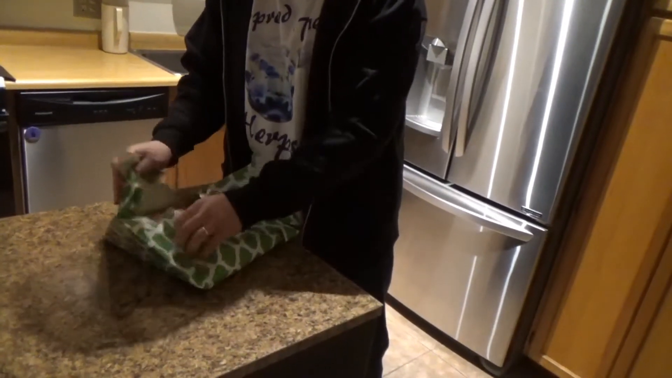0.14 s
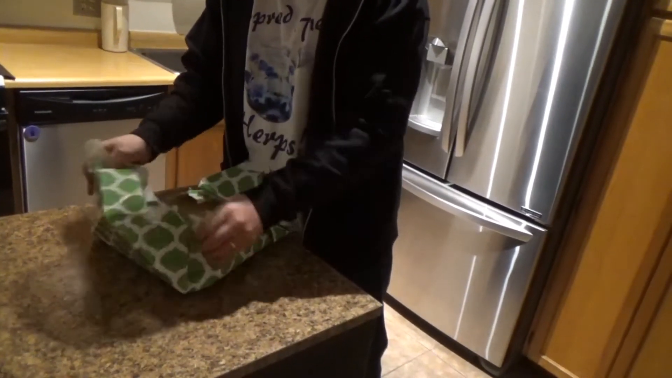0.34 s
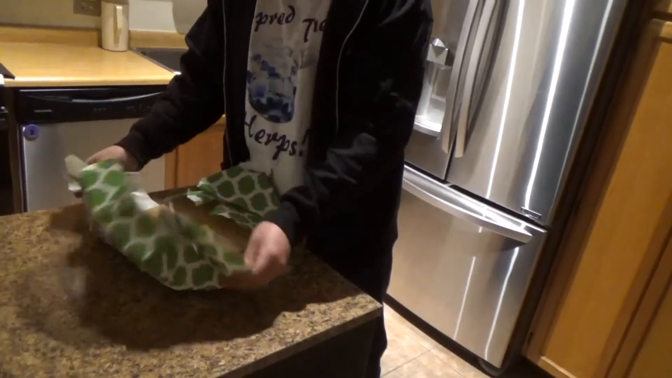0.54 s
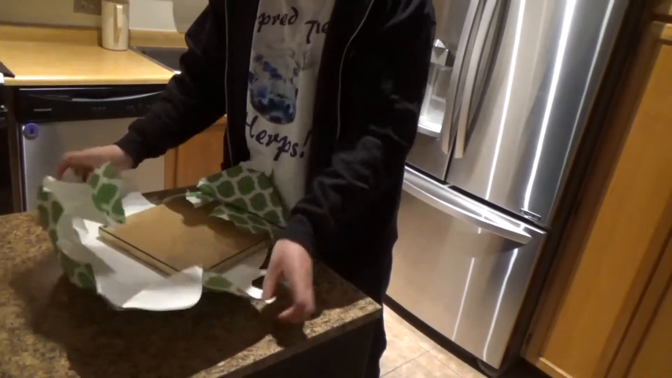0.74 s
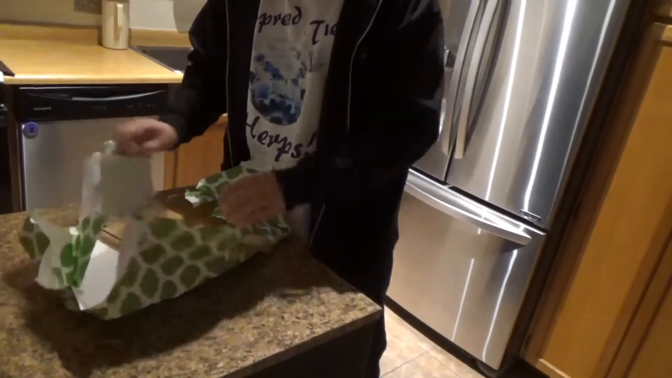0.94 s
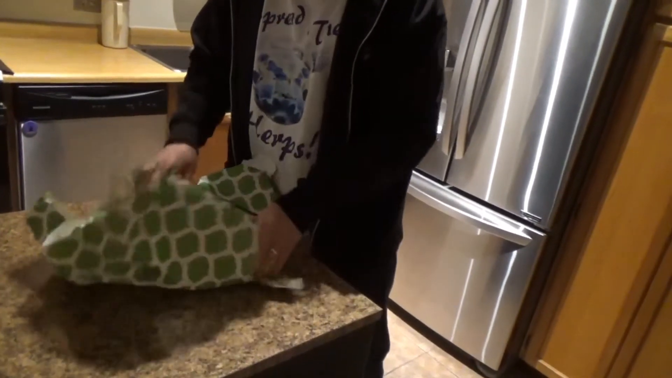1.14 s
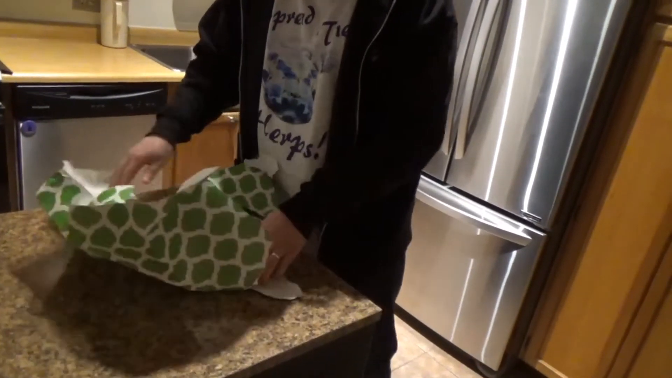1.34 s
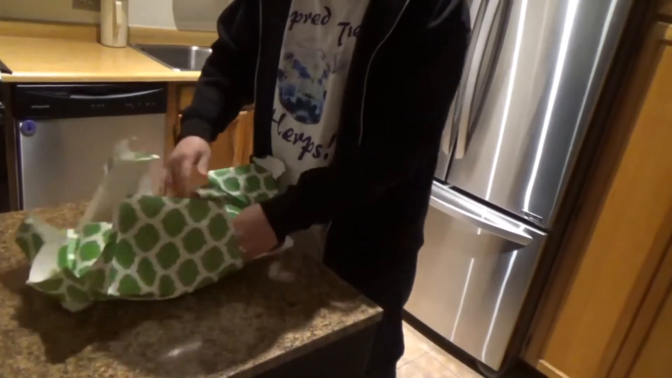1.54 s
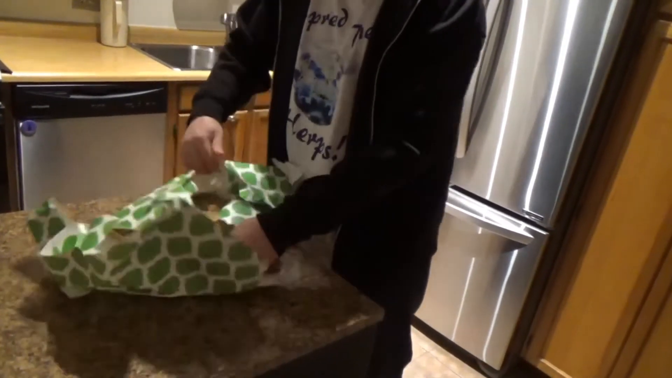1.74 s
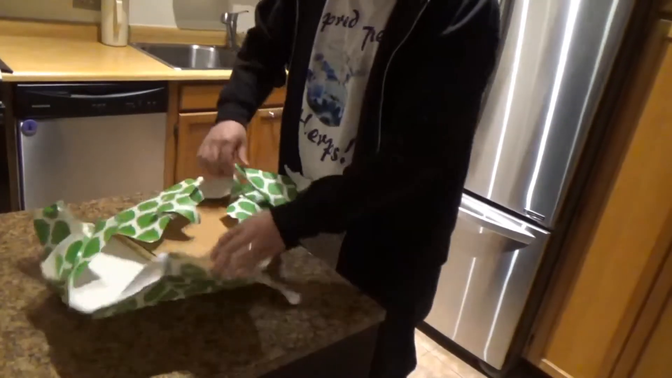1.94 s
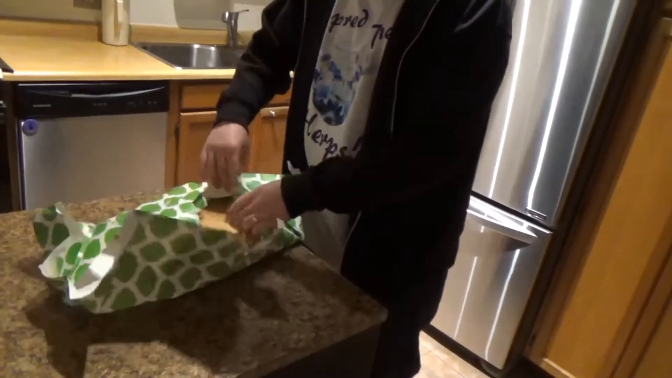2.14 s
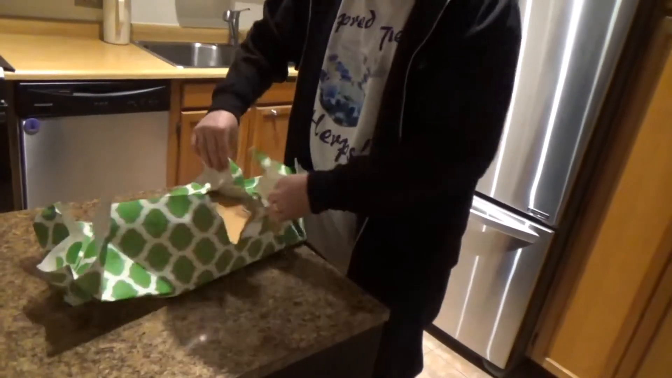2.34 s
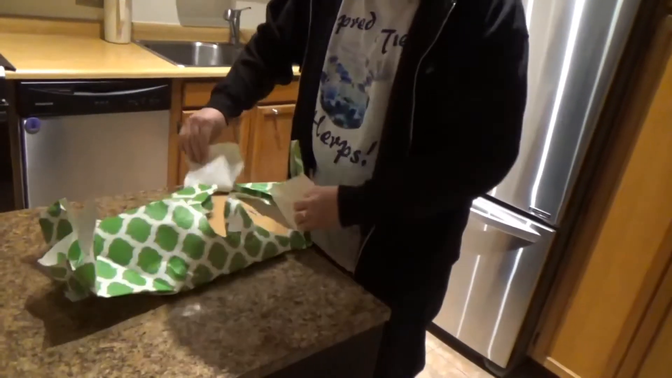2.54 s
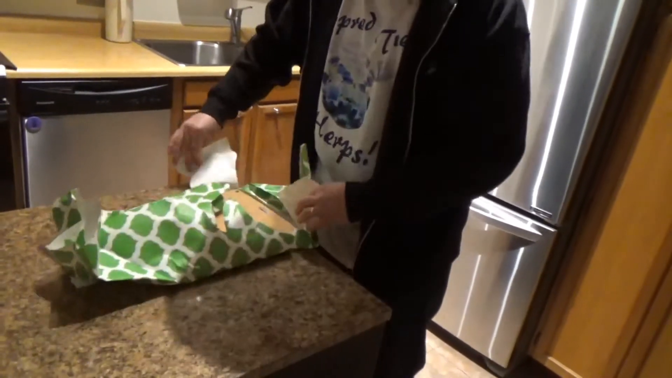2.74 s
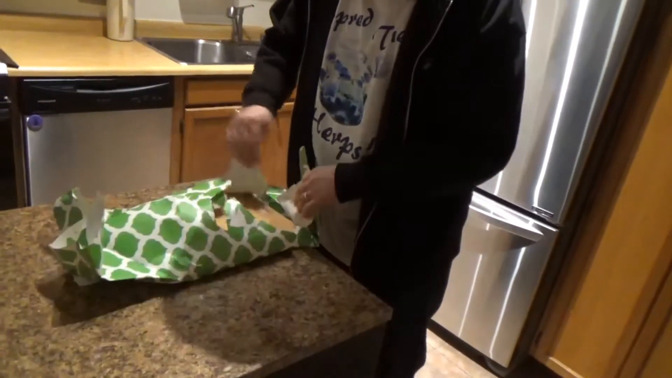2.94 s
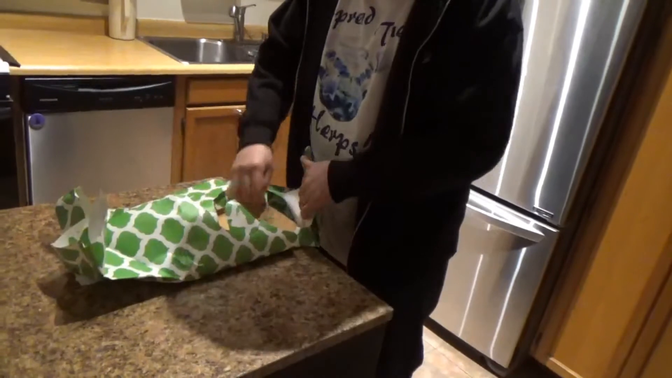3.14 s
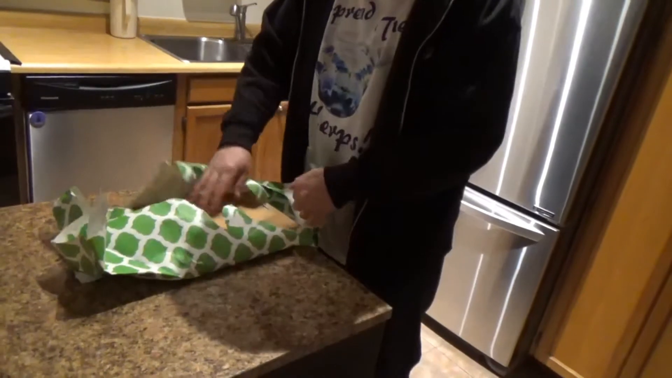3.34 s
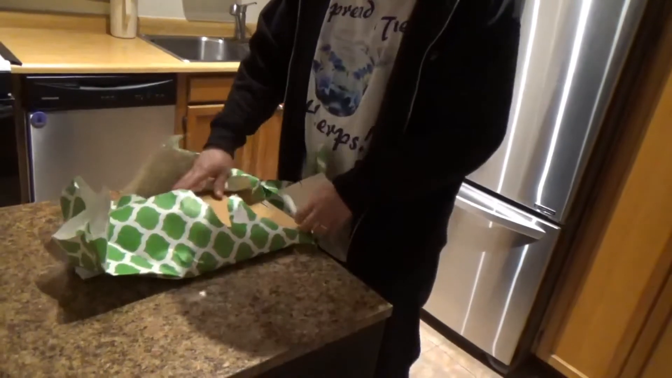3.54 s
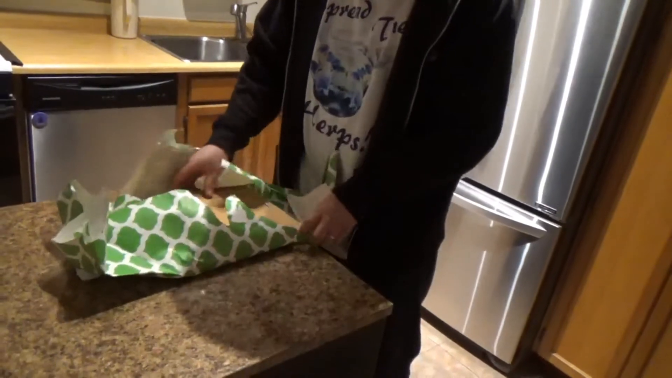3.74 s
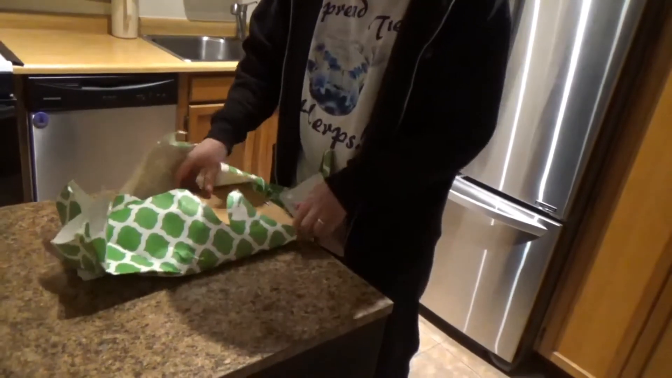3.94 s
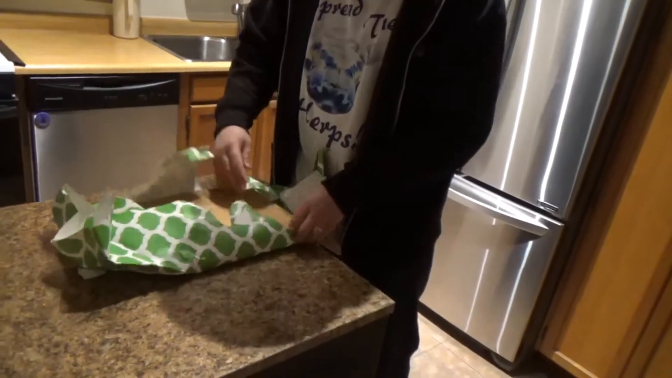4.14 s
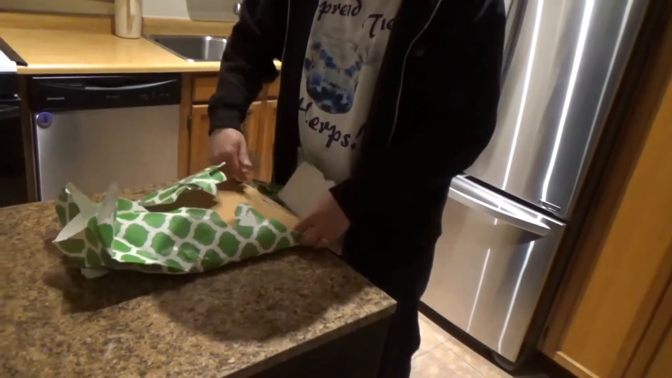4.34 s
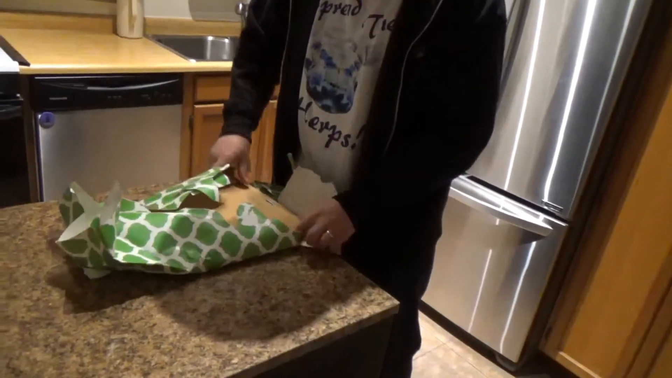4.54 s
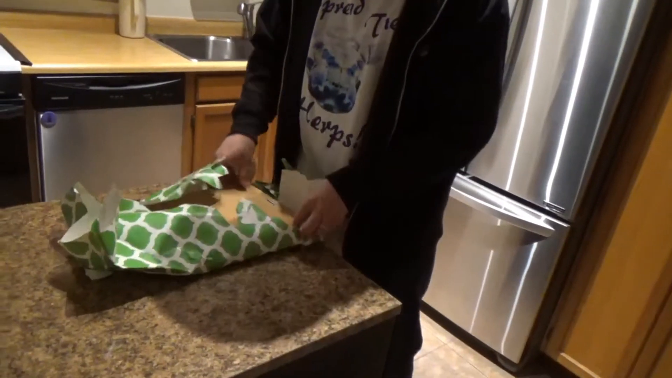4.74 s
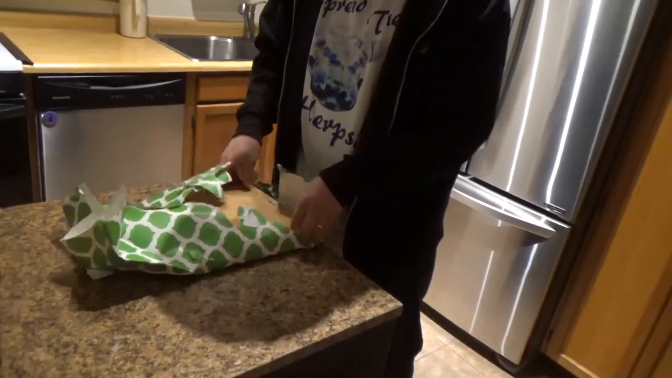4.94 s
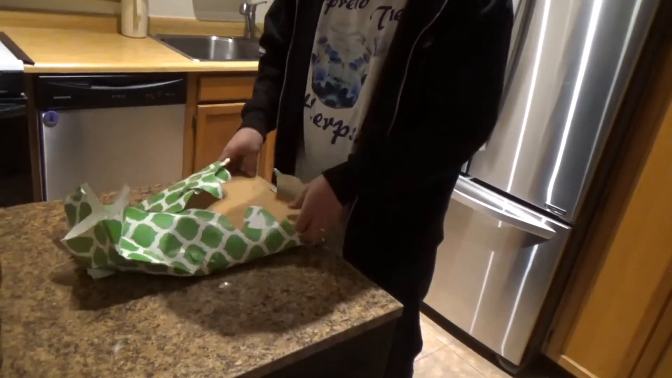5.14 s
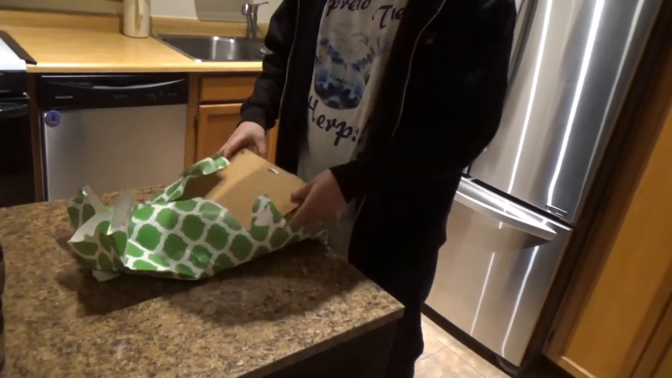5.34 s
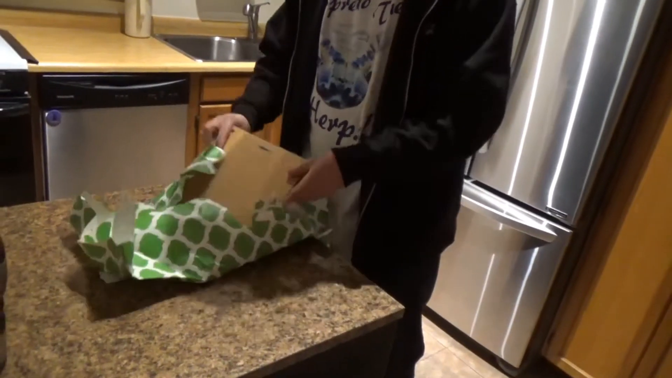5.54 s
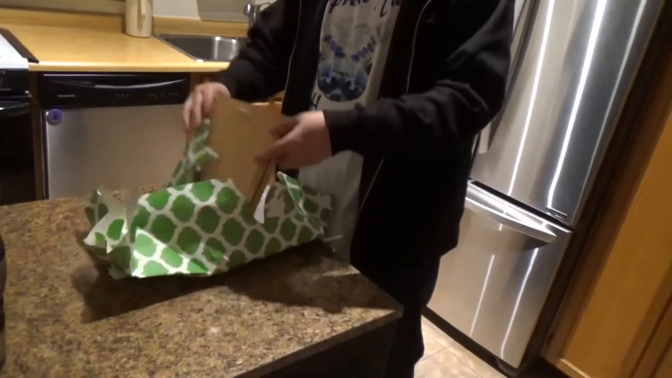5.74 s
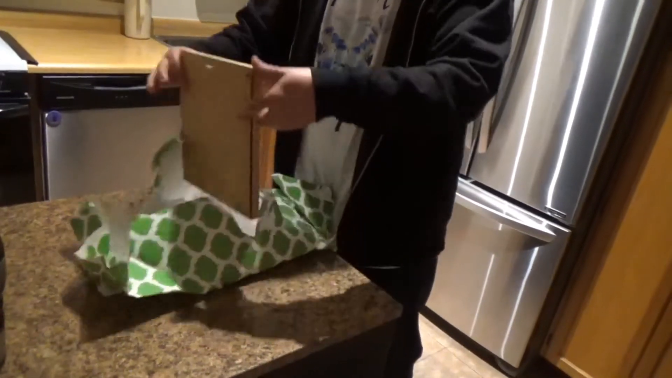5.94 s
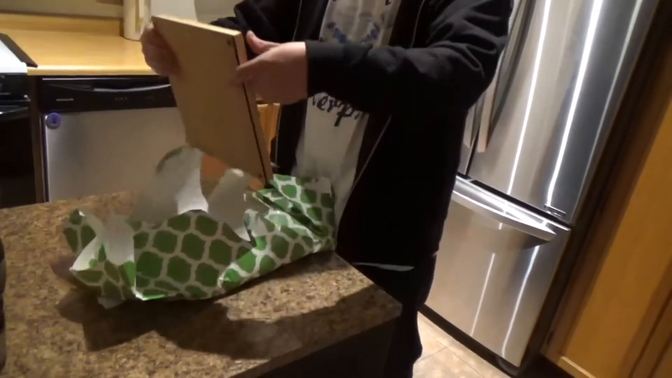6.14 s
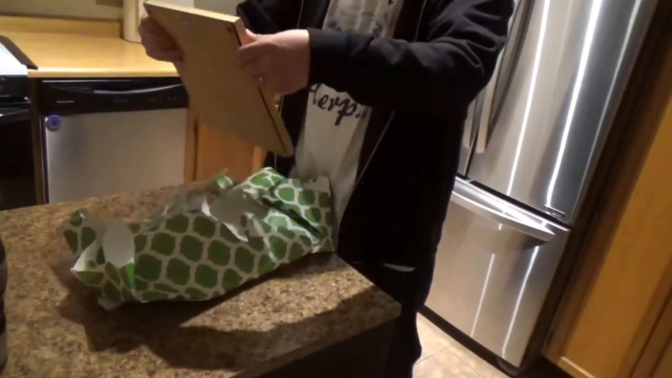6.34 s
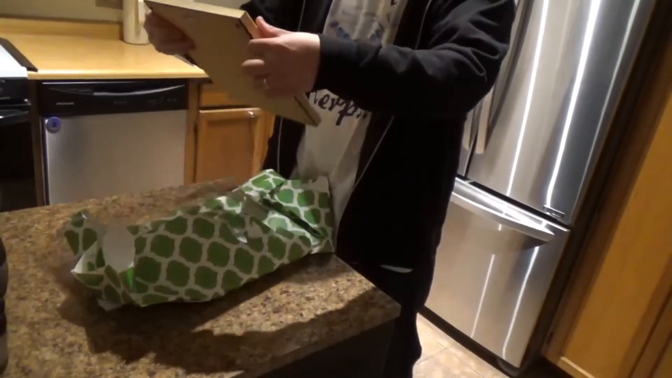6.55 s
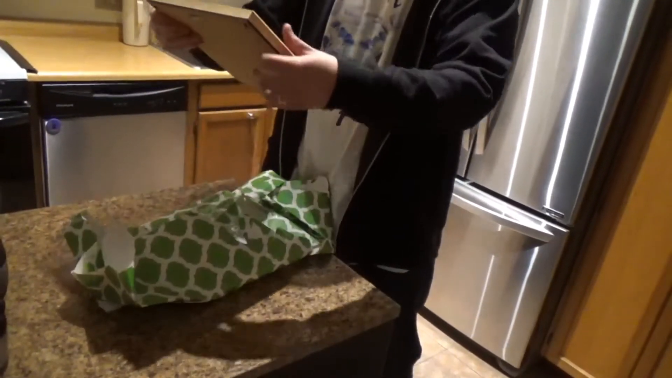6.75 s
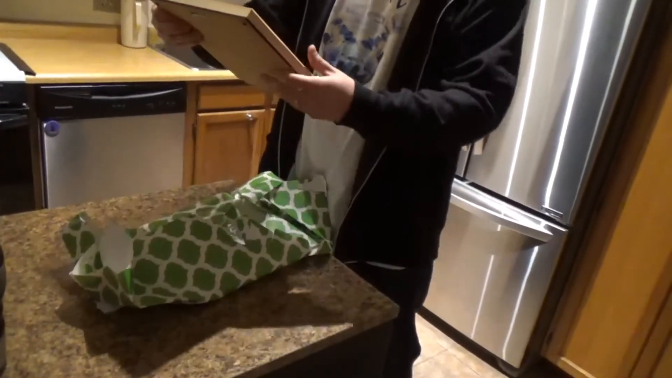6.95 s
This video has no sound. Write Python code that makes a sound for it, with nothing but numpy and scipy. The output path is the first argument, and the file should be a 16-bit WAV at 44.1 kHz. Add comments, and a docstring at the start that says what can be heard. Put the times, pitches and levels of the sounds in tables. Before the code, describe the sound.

Close, crisp gift-wrap tearing and crackling on a stone counter, ending as a board-backed present is drawn out and the room falls quiet.

```python
"""Gift wrap is torn and folded back by hand on a stone counter, then a flat board-backed present is lifted out.
Random buckles drive noise bands for the crackling paper; snaps, crunches and hollow pops are short rings on top.
The present drags and shudders as friction shakes its board, slides out with a wavering swish, and is tapped.
Echoes of a small hard-walled kitchen, wavering refrigerator tones and soft air noise surround it."""
import sys
import numpy as np
from scipy import signal
from scipy.io import wavfile
from scipy.ndimage import uniform_filter1d

SR = 44100
rng = np.random.default_rng(int(sys.argv[2]) if len(sys.argv) > 2 else 0)


def int16_out(signal):
    """Quantize to a 16-bit WAV file."""
    q = np.round(np.clip(np.atleast_2d(signal).T, -1, 1) * 32767)
    wavfile.write(sys.argv[1], SR, q.astype(np.int16))


N = 312669   # length in samples


def paper(crease_db=-11.0, creases_per_s=28):
    """Crumpling and tearing: the same buckles shake the sheet, ring its facets and break its fibres."""
    # How the bending sheet sounds. Each row: pitch in Hz, relative level in dB.
    flex_colour = [(150, -19.5), (240, -7.5), (370, 0.5), (600, 3.5)]
    # How the small flat facets sound. Each row: pitch in Hz, relative level in dB.
    facet_colour = [(800, -1.5), (1150, 1), (1700, 2), (2800, 3.5), (4000, 2), (5400, 2.5)]
    # How the breaking fibres sound. Each row: pitch in Hz, relative level in dB.
    fibre_colour = [(6500, 2), (7600, -2), (8900, 7), (10600, -3.5)]
    buckles_per_s, pull_db = 240, -37.5   # the rate, and the fibre level at which it holds
    rate_follows, slack_db = 0.7, -6      # power by which the rate follows the effort; least effort
    jerk_db, jerk_s, rip_pull_db = 3.2, 0.003, -27   # jerks are full once the fibres reach rip_pull_db
    rest_db, strip_db = -56, -6   # creases thin out below rest_db; strip_db is against the crinkling
    crinkling, breaking, flexing = hands()

    # gentle handling gives separate ticks; in a hard pull they run together into a jerky rip
    effort = np.maximum(breaking / from_db(pull_db), from_db(slack_db))
    pace = effort ** rate_follows
    ripping = np.minimum(breaking / from_db(rip_pull_db), 1)
    jerks = steady(from_db(jerk_db * ripping * wobble(jerk_s)), seconds=0.012)

    starts = buckles(per_s=buckles_per_s * pace, spread_db=0.0)   # all of one size
    flex = rustle(starts, flex_colour, 146, 739, burst_s=0.013, rub=0.15, count=5)
    facets = rustle(starts, facet_colour, 700, 6000, burst_s=0.0024, rub=0.3, count=9)
    fibres = rustle(starts, fibre_colour, 6000, 11500, burst_s=0.0015, rub=0.42, count=4)

    # in a rip the creases crowd together, each one slighter; at rest they die out
    crowding = pace * (1 + 2 * ripping ** 2)
    moving = np.minimum(crinkling / from_db(rest_db), 1) ** 2
    small_creases = creases(creases_per_s * crowding * moving)
    ticking = from_db(crease_db) * rms_one(small_creases / crowding ** 0.37)
    tearing = from_db(strip_db) * ripping * strip()

    crackle = (facets + ticking + tearing) * crinkling + fibres * breaking
    return flex * flexing + jerks * crackle


def hands():
    """Rips, folds and stirring add up in power: gains over time of crinkling, fibres and flexing."""
    # The paper rips. Each row: start in seconds, length in seconds, crinkling of the facets in dB,
    # breaking fibres in dB above the crinkling.
    rips = [(0.018, 0.029, -33.5, 10.5), (0.172, 0.022, -25, 2), (0.233, 0.099, -22.5, -0.5),
            (0.337, 0.15, -27, -1), (0.478, 0.072, -26.5, 3), (2.008, 0.084, -33.5, 1.5),
            (2.414, 0.019, -22.5, -2), (2.468, 0.19, -23, 1.5), (2.659, 0.13, -31.5, -2),
            (2.862, 0.01, -32, 3), (2.985, 0.066, -33.5, 3.5), (3.103, 0.074, -35.5, 0.5),
            (3.302, 0.017, -30, -0.5), (3.365, 0.1, -24, -1), (3.49, 0.14, -31, 3),
            (3.635, 0.11, -26.5, 0.5), (3.779, 0.047, -34.5, 1.5), (4.216, 0.06, -27.5, -1),
            (4.279, 0.046, -24, -1)]
    # A flap is gripped and folded back. Each row: start in seconds, length in seconds, crinkling in dB,
    # breaking fibres in dB above the crinkling, flexing of the sheet in dB above the crinkling.
    folds = [(0.0, 0.098, -29, -14, -26), (0.18, 0.37, -32, -13, -7.5), (0.549, 0.18, -29.5, -16, -14),
             (0.803, 0.02, -32.5, -13, -12), (0.918, 0.014, -29.5, -17, -13.5), (0.988, 0.22, -32, -9, -13),
             (1.165, 0.019, -30, -7.5, -7.5), (1.238, 0.065, -38.5, -2, -11),
             (1.417, 0.018, -40, -8.5, -12), (1.565, 0.027, -35, -4.5, -5.5), (1.619, .19, -32, -4, -9),
             (1.846, 0.12, -38, -15, -12.5), (2.149, 0.088, -35.5, -5, -13.5), (2.287, 0.3, -31.5, -6, -11),
             (2.871, 0.22, -32.5, -4.5, -10.5), (3.213, 0.043, -34.5, -6.5, -7.5),
             (3.31, 0.24, -37, -5, -13), (3.66, 0.12, -34.5, -31, -12), (3.97, 0.095, -39, -2.5, -22),
             (4.088, 0.14, -34.5, -0.5, -13), (4.333, .21, -35, 1, -9.5), (4.68, 0.25, -44, 1, -10.5),
             (4.894, 0.068, -37, 0, -13), (5.079, 0.094, -38.5, 4.5, -19), (5.181, 0.041, -31, -10, -15),
             (5.278, 0.12, -36.5, -6.5, -5), (5.447, 0.02, -32, -5, -7.5),
             (5.507, 0.15, -33.5, -2.5, -12.5), (5.733, 0.21, -31.5, -2.5, -13),
             (5.961, 0.17, -34.5, 3.5, -17)]
    # The loose wrap stirs, falls nearly still, then stirs faintly again.
    # Each row: time in seconds, crinkling in dB.
    stir = [(0, -27.5), (0.78, -46), (0.9, -54), (1.52, -51), (1.7, -44.5), (2.2, -38.5), (3.8, -43),
            (4.65, -46.5), (5.5, -39), (6.15, -41), (6.35, -53), (6.78, -64), (7.08, -55.5)]
    rip_flex_db = -18   # a taut sheet hardly flexes: level against its crinkling
    stir_fibre_db, stir_flex_db = -2, -15   # against the crinkling

    stir_db = in_time(stir)[0]
    power = from_db(stir_db + np.array([[0], [stir_fibre_db], [stir_flex_db]])) ** 2
    for s, length, db, fibre_db in rips:
        pull = stroke(s, length, attack_s=0.015, sag_db_per_s=16, release_db_per_s=284)
        power += np.outer(from_db([db, db + fibre_db, db + rip_flex_db]) ** 2, pull)
    for s, length, db, fibre_db, flex_db in folds:
        push = stroke(s, length, attack_s=0.0046, sag_db_per_s=11, release_db_per_s=161.5)
        power += np.outer(from_db([db, db + fibre_db, db + flex_db]) ** 2, push)
    return np.sqrt(power)


def stroke(start, length, attack_s, sag_db_per_s, release_db_per_s):
    """Power of one hand move: it takes hold quickly, eases while it lasts, then the paper comes to rest."""
    t = np.maximum(np.arange(N) / SR - start, 0)
    # the release adds to the sag once the move is over
    fall_db = sag_db_per_s * t + release_db_per_s * np.maximum(t - length, 0)
    gain = np.minimum(t / attack_s, 1) * from_db(-np.minimum(fall_db, 100))
    return gain ** 2


def buckles(per_s, spread_db):
    """Random moments at which the paper gives; spread_db sets how unequal they are, up to a limit."""
    happens = rng.random(N) < per_s / SR
    sizes = from_db(spread_db * np.minimum(rng.exponential(1, N), 4))
    return happens * sizes


def rustle(starts, colour, low_hz, high_hz, burst_s, rub, count, variety_db=4.5, click=0.41):
    """Each buckle clicks, starts a short avalanche and favours its own pitches; rubbing fills the gaps."""
    out, edges = 0, np.geomspace(low_hz, high_hz, count + 1)
    fractures = [ticks(N, spread_db=4.0) for _ in range(2)]
    for k, (low, high) in enumerate(zip(edges, edges[1:])):
        # each band gets a new random strength every 32 samples
        strengths = from_db(variety_db * rng.standard_normal(N // 32 + 1))
        favour = np.repeat(strengths, 32)[:N]
        kicks = rms_one(starts * favour)
        burst_power = fade(kicks ** 2, burst_s) / (burst_s * SR)
        avalanche = fractures[k % 2] * np.sqrt(burst_power + rub ** 2)
        grains = band(avalanche + click * (-1) ** k * kicks, low, high)
        level_db = at_hz(colour, np.sqrt(low * high))
        out = out + from_db(level_db) * rms_one(grains)
    return steady(out, seconds=0.046)


def creases(per_s, spread_db=2.6, damping=0.21, run_s=0.00052, count=7):
    """Small creases give at random, each with a sharp tick and the ring of its own facet; rms 1 overall."""
    kicks = buckles(per_s, spread_db)
    dealt = rng.integers(0, count, N)   # which facet each crease rings
    fractures, out = ticks(N, spread_db=0.5), 0
    for k, hz in enumerate(np.geomspace(1200, 5200, count)):
        run = fractures * fade(kicks * (dealt == k), run_s)
        ring = resonate(run, hz, damping * hz) * np.sqrt(3000 / hz)
        tick = 0.76 * band(run, 870, 12700)
        out = out + ring + tick
    return rms_one(out)


def strip():
    """The torn strip rings in a narrow band that wanders and flares as its length and tension change; rms 1."""
    middle_hz, wander_octaves, wander_s = 2950, 0.3, 0.012
    hz = middle_hz * 2 ** (wander_octaves * wobble(wander_s))
    grain = band(ticks(N), 20, 330) * from_db(5 * wobble(wander_s / 2))
    return rms_one(grain * np.sin(2 * np.pi * np.cumsum(hz) / SR))


def snaps(pull_stretch=0.54, crack_share=0.45, puff_db=-40):
    """A crease pops through: a flick, a crack, a facet's ring, a shiver of the sheet and a faint puff of air."""
    # Loud creases giving way, and last the click of a light tap on the board.
    # Each row: time in seconds, body level in dB, pitch of the ring in Hz, crack level in dB.
    sharp_sounds = [(0.074, -9.5, 2330, -25), (0.178, -35, 3360, -11), (0.436, -13.5, 2760, -13),
                    (0.464, -13, 4800, -15), (0.561, -13.5, 2020, -18), (0.575, -18, 2190, -16),
                    (0.662, -14.5, 2810, -27), (0.821, -20, 3000, -30), (1.0665, -17.5, 2700, -16.5),
                    (1.1881, -13, 2080, -17), (1.234, -21, 2800, -35), (1.251, -25, 3600, -20.5),
                    (1.529, -15.5, 1510, -45), (1.577, -28, 1510, -18), (1.625, -21, 2200, -22),
                    (1.656, -15.5, 1850, -39), (1.7728, -12, 3100, -30), (1.797, -15, 1320, -20.5),
                    (1.839, -19, 3730, -34), (1.8592, -16.5, 1760, -18), (1.914, -15.5, 3240, -17),
                    (2.013, -17.5, 2620, -21), (2.061, -19, 1400, -26), (2.074, -24, 2700, -17),
                    (2.29, -13.5, 5260, -22), (2.307, -13, 2070, -16), (2.3163, -18, 2400, -13.5),
                    (2.468, -9.5, 1330, -14), (2.805, -20.5, 2170, -35), (2.923, -20, 2920, -23),
                    (3.04, -17.5, 4000, -13.5), (3.2367, -23, 3880, -15.5), (3.3666, -15, 3330, -16),
                    (3.4495, -9.5, 2980, -6), (3.6955, -14, 3080, -26), (3.744, -15, 3400, -18),
                    (3.791, -17.5, 2240, -17.5), (4.029, -14.5, 1860, -20), (4.122, -15, 3660, -15),
                    (4.136, -20, 3200, -14.5), (4.263, -13.5, 3860, -15), (4.448, -15.5, 1920, -17),
                    (4.4575, -17, 2670, -15), (4.4668, -15, 2940, -16), (4.815, -26.5, 1180, -34),
                    (4.922, -16, 3200, -38), (5.448, -17, 3100, -52), (5.463, -18.5, 1820, -13.5),
                    (5.559, -16.5, 2250, -39), (5.706, -29, 3500, -17.5), (5.749, -15.5, 2640, -37),
                    (5.758, -15, 2180, -26), (5.7735, -14.5, 2820, -35), (5.8053, -14.5, 3580, -31),
                    (6.512, -38, 2290, -52)]
    out, t = np.zeros(N), np.arange(SR // 20) / SR
    run_s, shiver_db, shiver_s = 0.0011, -27, 0.013
    shiver = from_db(shiver_db) * np.exp(-t / shiver_s)
    flick = 4.0 * (t == 0)
    puff = band(np.exp(-t / 0.0013), 30, 350)
    for s, body_db, hz, crack_db in sharp_sounds:
        # a dull snap is little more than a flick; the more fibres crack, the longer it runs on
        length = run_s * from_db(pull_stretch * max(crack_db + 29.5, -4))
        body_run = flick + ticks(len(t)) * (np.exp(-t / length) + shiver)
        crack_run = flick + ticks(len(t)) * (np.exp(-t / (crack_share * length)) + shiver / 2)
        add(out, s, body_db, facet_ring(body_run, hz))
        add(out, s, crack_db, fibre_crack(crack_run))
        add(out, s, body_db + puff_db, puff)
    return out


def crunches():
    """A crease collapses along its length: a run of fractures that swells and dies."""
    # Creases that crumple in a quick run. Each row: time of its height in seconds, body level in dB,
    # pitch of the paper facet in Hz, crack level in dB.
    crumples = [(2.2105, -10.5, 3070, -17), (2.432, -21, 1900, -16), (2.886, -16.5, 3150, -14.5),
                (3.994, -19, 3250, -16), (4.2065, -21, 3800, -10), (6.386, -33.5, 2420, -38.5)]
    crunch_s = 0.0025   # sets how quickly a run swells, and again dies
    out, t = np.zeros(N), np.arange(-SR // 20, SR // 20) / SR
    swell = 1 / np.cosh(2 * t / crunch_s) ** 0.5
    for s, body_db, hz, crack_db in crumples:
        add(out, s + t[0], body_db, facet_ring(ticks(len(t)) * swell, hz))
        add(out, s + t[0], crack_db, fibre_crack(ticks(len(t)) * swell))
    return out


def facet_ring(run, hz):
    """The facet beside a crease rings for a few cycles, and the sheet around it joins in near that pitch."""
    damping, sheet_share = 0.32, 0.22
    ring = resonate(run, hz, damping * hz)
    return band(ring + sheet_share * run, 0.41 * hz, 2.44 * hz)


def fibre_crack(run):
    """Breaking fibres give a broad crack with a bright top."""
    crack = band(run, 3800, 11000)
    return crack + 3.0 * resonate(crack, 9000, 1900)


def pops(flutter_s=0.016, damping=0.17, onset_s=0.00056):
    """A wide panel flips and flutters to rest, ringing low over the hollow beneath; a weak one is shorter."""
    # Broad panels flip over, and last a light tap on the board.
    # Each row: time in seconds, level in dB, pitch in Hz.
    hollow_sounds = [(0.942, -21, 1050), (1.68, -16.5, 1080), (1.798, -16.5, 930), (2.920, -19, 730),
                     (2.978, -17.5, 940), (3.216, -14, 980), (3.261, -18, 1070), (4.92, -18, 1360),
                     (5.293, -19, 1310), (5.404, -19, 1320), (5.770, -19, 920), (6.511, -29.5, 1250)]
    out, t = np.zeros(N), np.arange(SR // 10) / SR
    strongest_db = max(db for _, db, _ in hollow_sounds)
    for s, db, hz in hollow_sounds:
        length = flutter_s * from_db((db - strongest_db) / 2)
        flutter = ticks(len(t)) * np.exp(-t / length) * (1 - np.exp(-t / onset_s))
        add(out, s, db, resonate(band(flutter, 680, 3100), hz, damping * hz))
    return out


def present():
    """Friction drives the backing board: a rough drag, then a brief stick-slip shudder."""
    # The present drags on the counter, then creeps a little further. Each row: time in seconds, level in dB.
    drag_path = [(4.15, -95), (4.22, -55), (4.29, -36), (4.34, -33), (4.42, -60), (4.6, -59), (4.72, -49.5),
                 (4.82, -57), (4.9, -88)]
    # It shudders as it is tipped up. Each row: time in seconds, slips per second, level in dB.
    shudder_path = [(5.285, 168, -75), (5.298, 144, -31), (5.32, 164, -29), (5.355, 110, -33.5),
                    (5.40, 100, -48), (5.46, 150, -88)]
    # Resonances of the backing board. Each row: pitch in Hz, width in Hz, relative level in dB.
    board = [(152, 10.5, -2), (220, 29, 3.5), (385, 71, 5), (511, 38, 7), (640, 57, 6.5)]
    drag_db = in_time(drag_path)[0]
    slips_per_s, shudder_db = in_time(shudder_path)

    unevenness = rms_one(fade(rng.standard_normal(N), 0.004))
    cycles = np.cumsum(slips_per_s * (1 + 0.17 * unevenness)) / SR
    jolts = np.diff(np.floor(cycles), prepend=0)   # one jolt per finished cycle
    slips = rms_one(jolts) + 0.22 * rng.standard_normal(N)
    drag = band(rng.standard_normal(N), 324, 540)

    out = 0
    for force, db in ((slips, shudder_db), (drag, drag_db)):
        ring = 0
        for k, (hz, width_hz, gain_db) in enumerate(board):
            ring = ring + (-1) ** k * from_db(gain_db) * resonate(force, hz, width_hz)
        out = out + from_db(db) * steady(ring, seconds=0.054)
    return out


def slide(hiss_db=-4, spray_db=-3):
    """An edge catching on the paper's grain gives a narrow, broken swish and a broad friction hiss."""
    # The edge slides out along the paper. Each row: time in seconds, pitch of the swish in Hz, level in dB.
    slide_path = [(5.9, 8300, -86), (5.995, 8430, -35), (6.025, 8400, -28.5), (6.10, 8420, -29),
                  (6.145, 9000, -26.5), (6.18, 8900, -43), (6.26, 8850, -81)]
    hz, db = in_time(slide_path)
    catch_db, catch_s, waver_hz, grain_hz = 3.0, 0.004, 110, 300

    grain = steady(band(rng.standard_normal(N), 32, grain_hz), seconds=0.038)
    grain = grain * from_db(catch_db * wobble(catch_s))
    wavering_hz = hz + waver_hz * wobble(catch_s)
    swish = rms_one(grain * np.sin(2 * np.pi * np.cumsum(wavering_hz) / SR))
    hiss = rms_one(band(ticks(N), 3100, 5400))
    spray = rms_one(band(ticks(N), 6800, 10600))   # the higher part of the hiss
    catches = rms_one(from_db(catch_db * wobble(catch_s)))
    return from_db(db) * catches * (swish + from_db(hiss_db) * hiss + from_db(spray_db) * spray)


def kitchen(x, wet_db=-4.5, turns_per_s=7):
    """Room echoes: the folds keep facing other ways, so their sound passes between two echo patterns."""
    facing = 2 * np.pi * turns_per_s * np.arange(N) / SR
    echoes = 0
    for share in (np.cos(facing), np.sin(facing)):
        echoes = echoes + signal.oaconvolve((x * share)[None], room_response(), axes=1)[:, :N]
    return from_db(wet_db) * echoes


def room_response(width=0.53, wide_hz=600):
    """Dense noise echoes that die at their own pace in each octave; the ears differ mostly in the treble."""
    # How long echoes last. Each row: pitch in Hz, time to fall by 60 dB in seconds.
    decay_times = [(150, 1), (2500, 0.33), (9000, 0.2)]
    t = np.arange(SR // 2) / SR
    octaves = 60 * 2.0 ** np.arange(8)
    onset = np.clip(t / 0.002 - 0.5, 0, 1) * (1 + np.exp(-t / 0.012))
    opposite = np.array([[1], [-1]])   # plus on the left, minus on the right
    response = 0
    for hz in octaves:
        centre = hz * np.sqrt(2)
        decay = onset * from_db(-60 * t / at_hz(decay_times, centre))
        noise = rng.standard_normal((2, len(t))) * decay / np.sqrt(np.sum(decay ** 2))
        mid, side = band(noise, hz, 2 * hz)
        spread = width * centre / np.hypot(centre, wide_hz)
        response = response + mid + spread * side * opposite
    return response


def background(air_db=-66, width=0.95):
    """Slightly wavering refrigerator tones over soft air noise that is nearly unrelated between the ears."""
    # Refrigerator tones. Each row: pitch in Hz, width of the blurred tone in Hz, level in dB.
    hum_tones = [(118.4, .6, -76), (228, 12, -76), (350, 20, -71), (675, 14, -67.5)]
    # Colour of the still room air. Each row: pitch in Hz, relative level in dB.
    air_colour = [(40, -29), (100, -8), (350, 6), (900, 16), (9000, -8)]
    t = np.arange(N) / SR
    hum = 0
    for hz, width_hz, db in hum_tones:
        # a randomly drifting phase blurs the tone
        drift = np.cumsum(rng.standard_normal(N)) * np.sqrt(2 * np.pi * abs(width_hz) / SR)
        hum = hum + from_db(db) * np.sqrt(2) * np.sin(2 * np.pi * hz * t + drift)

    white = rng.standard_normal((2, N))
    air = 0
    for k, hz in enumerate(30 * 2.0 ** np.arange(9)):
        level_db = at_hz(air_colour, hz * np.sqrt(2))
        air = air + from_db(level_db) * rms_one(band(white[k % 2], hz, 2 * hz))
    air = rms_one(air)
    # the same noise backwards, with opposite signs left and right, makes it wide
    sides = width * air[::-1] * np.array([[1], [-1]])
    return hum + from_db(air_db) * (air + sides)


def add(out, s, db, sound):
    """Mix in a short sound; db is the level that its energy would have within one millisecond."""
    at = int(s * SR)
    scaled = from_db(db) * sound * np.sqrt(SR / 1000 / np.sum(sound ** 2))
    out[at:at + len(sound)] += scaled[:N - at]


def ticks(size, spread_db=2.5):
    """Tiny fractures of either sign: most are slight, a few are strong."""
    strength_db = abs(spread_db) * np.clip(rng.standard_normal(size), -2, 2)
    return rng.standard_normal(size) * from_db(strength_db)


def wobble(seconds):
    """Smooth random unevenness with rms 1 and no extreme peaks."""
    smooth = fade(fade(rng.standard_normal(N), seconds), seconds / 2)
    return rms_one(np.tanh(rms_one(smooth)))


def fade(x, seconds):
    """Every impulse dies away exponentially."""
    return signal.lfilter([1], [1, -np.exp(-1 / (seconds * SR))], x + 1e-18)


def steady(x, seconds):
    """The same grain, with its level evened out to about 1 over the given time."""
    size = max(int(seconds * SR), 2)
    power = uniform_filter1d(uniform_filter1d(x * x, size), size)
    return x / np.sqrt(np.abs(power) + 1e-12)


def resonate(x, hz, width_hz):
    """A two-pole resonance, like one ringing mode, with gain 1 on top."""
    r = np.exp(-np.pi * width_hz / SR)
    top = np.array([1, 0, -1]) * (1 - r * r) / 2
    bottom = [1, -2 * r * np.cos(2 * np.pi * hz / SR), r * r]
    return signal.lfilter(top, bottom, x + 1e-18)


def band(x, low_hz, high_hz):
    """Keep only the pitches between two limits (causal band-pass)."""
    limits = [low_hz, min(high_hz, SR / 2 - 1000)]
    return signal.sosfilt(signal.butter(2, limits, "band", fs=SR, output="sos"), x + 1e-18)


def from_db(db):
    """Decibels to gain."""
    return 10 ** (np.asarray(db) / 20)


def rms_one(x):
    """Scale to rms 1."""
    return x / np.sqrt(np.mean(x ** 2) + 1e-20)


def in_time(rows):
    """One curve over time for each column after the first, joined by straight lines."""
    s, *columns = np.transpose(rows)
    return [np.interp(np.arange(N) / SR, s, c) for c in columns]


def at_hz(points, hz):
    """Read a table of values by pitch on a log-frequency axis."""
    f, value = np.transpose(points)
    return np.interp(np.log(hz), np.log(f), value)


def scene():
    """Paper, present and their echoes sit just left of straight ahead; hum and air lie beneath."""
    # Where the hands work. Each row: time in seconds, left over right in dB.
    place = [(0, 1.3), (3.5, 0.25), (6.2, 0.5)]
    pan_db = in_time(place)[0]
    rubbing = paper() + present() + slide()
    snapping = snaps() + crunches() + pops()
    # snaps radiate straight ahead and stir the room less than the rustle does
    heard = rubbing + snapping + kitchen(rubbing + 0.7 * snapping)
    return heard * from_db([pan_db / 2, -pan_db / 2]) + background()


def record(dry):
    """The tallest peaks are rounded and the top octave is cut."""
    ceiling, cutoff_hz = 0.62, 11080
    rounded = dry / (1 + (dry / ceiling) ** 4) ** 0.25
    steep = signal.ellip(12, 0.1, 80, cutoff_hz, fs=SR, output="sos")
    return signal.sosfilt(steep, rounded)


dry = scene()
out = record(dry)
int16_out(out)
```